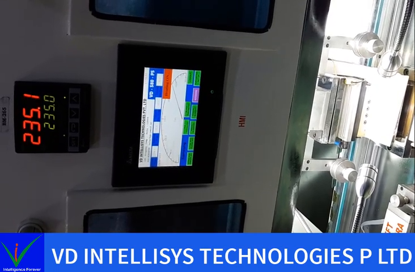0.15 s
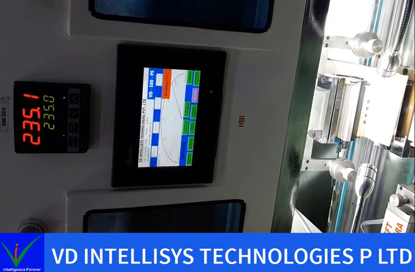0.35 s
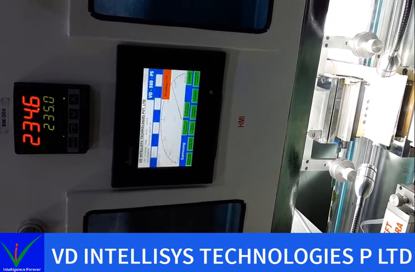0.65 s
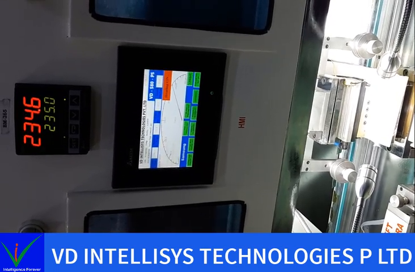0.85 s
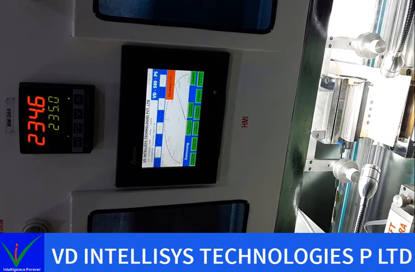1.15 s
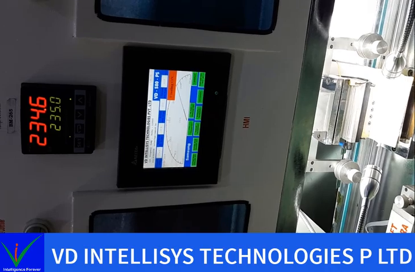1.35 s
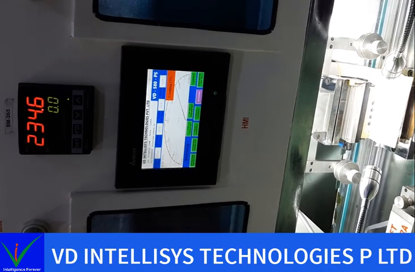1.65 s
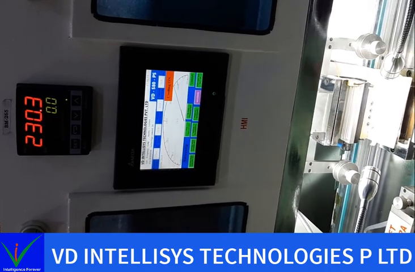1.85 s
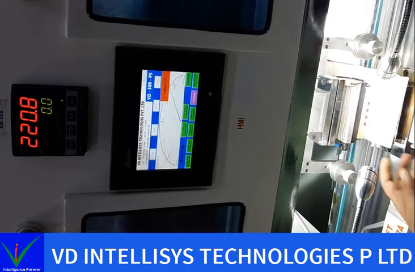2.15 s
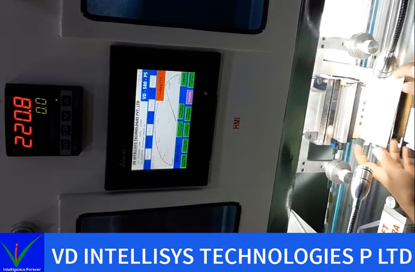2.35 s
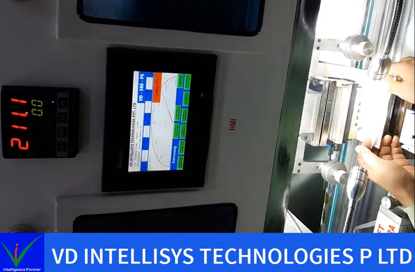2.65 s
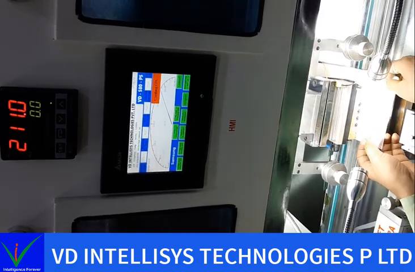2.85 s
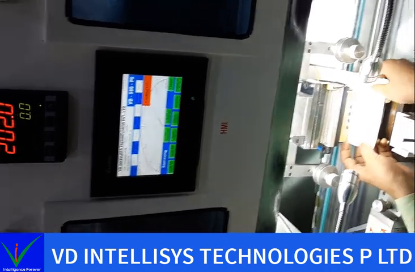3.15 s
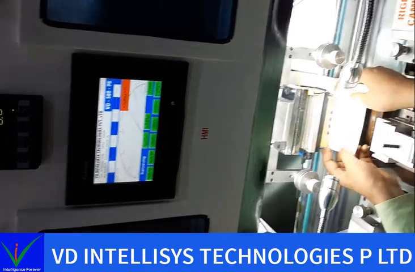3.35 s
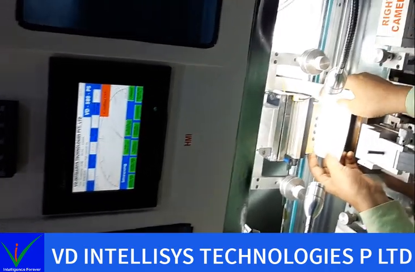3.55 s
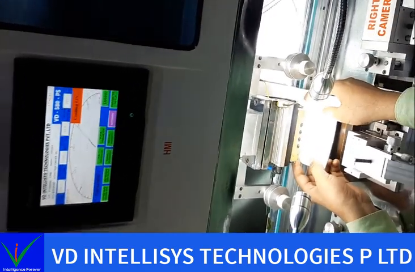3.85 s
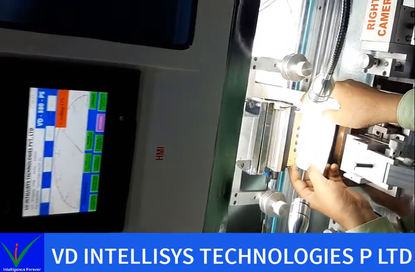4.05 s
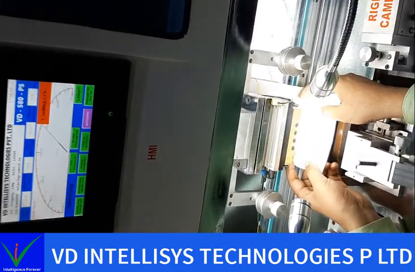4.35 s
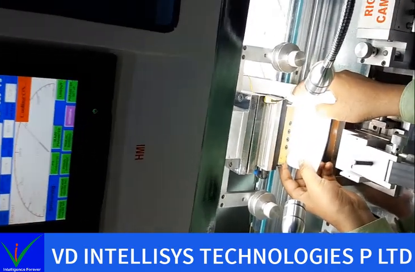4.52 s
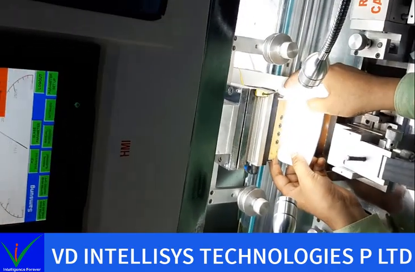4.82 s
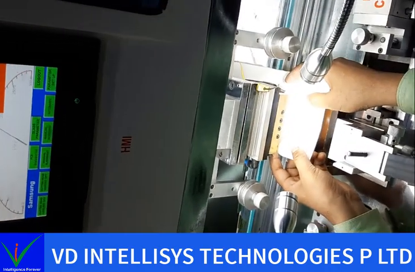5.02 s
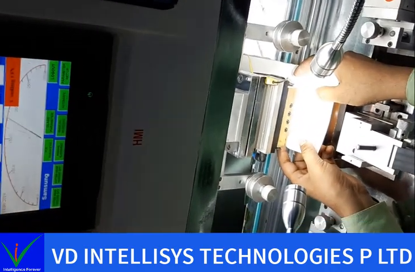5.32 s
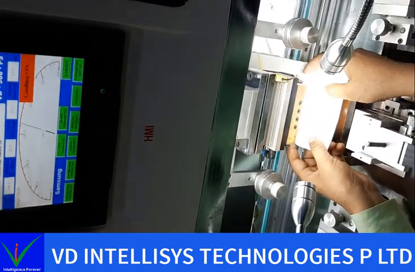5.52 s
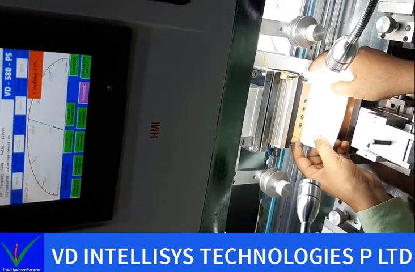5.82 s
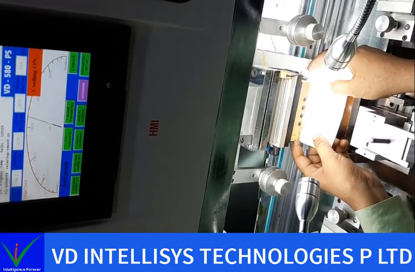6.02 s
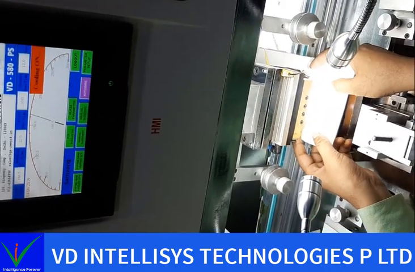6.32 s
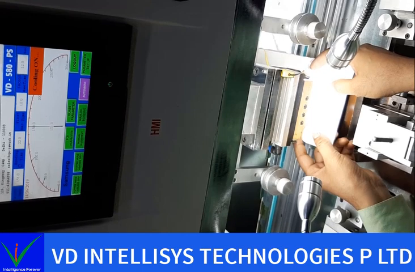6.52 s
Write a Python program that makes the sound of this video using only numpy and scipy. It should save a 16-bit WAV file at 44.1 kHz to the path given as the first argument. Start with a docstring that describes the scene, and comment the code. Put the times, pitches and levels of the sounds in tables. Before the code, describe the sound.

Close stereo pickup beside a bonding machine: low uneven motor noise with faint hum and a small air leak, then a quick click-like valve burst. Air rushes out brightly, fades a little, and leaves a narrow, hollow howl. Around two and a half seconds hands disturb the jet; the hiss swells into a loud, fluttering rush with low gusty buffeting, still blowing as the sound ends.

```python
"""Compressed air jets onto the hot head of a bonding machine: filtered noise hisses, gap resonances howl.
A valve snaps open at about 1 s (two decaying noise bursts); a first surge of air dies away within a second.
Hands reach into the stream and the microphones move closer: the hiss swells, most howl pitches sink a little.
Behind it the machine's noise bands and wavering hum lines are strong at first, then drop far back."""
import sys
import numpy as np
from scipy import signal
from scipy.fft import rfft, irfft, next_fast_len
from scipy.io import wavfile
from scipy.ndimage import uniform_filter1d, map_coordinates

SR = 44100
rng = np.random.default_rng(int(sys.argv[2]) if len(sys.argv) > 2 else 0)


def unload_audio(sound):
    """Save the sound as a 16-bit wav file, at the path given as the first command line argument."""
    columns = np.transpose(np.atleast_2d(sound))
    # keep every value between -1 and 1, then stretch to whole-number steps
    steps = np.round(np.clip(columns, -1, 1) * 32767)
    wavfile.write(sys.argv[1], SR, steps.astype(np.int16))


N = 294588
T = np.arange(N) / SR
SIZE = 2 * next_fast_len(N // 2 + 2048)
HZ = np.maximum(np.fft.rfftfreq(SIZE, 1 / SR), 1)

# Hiss strength, before a fixed offset: (time [s], level [dB])
HISS_LEVEL = [(1.87, -35.5), (2.43, -32), (2.92, -25.5), (3.44, -21), (3.58, -23), (4.4, -22.5),
              (5.35, -22), (5.6, -25), (6.64, -23)]
# Hiss spectrum, relative: (frequency [Hz], left density [dB per Hz], right density [dB per Hz])
HISS_COLOUR = [(1100, -30, -22), (1554, -3.5, -4), (1850, 5.5, 3.5), (2964, 3, 0.5), (3050, -0.5, -13),
               (4580, 4, -15), (5470, 3, -3), (6660, 1.5, -51), (7350, -3, -14.5), (9400, -2, -12),
               (9390, 1.5, -4.5), (11700, 1.5, -2.5), (14000, 1.5, -1.5), (17500, -3.5, -8.5)]
# Hiss stereo: (frequency [Hz], left-right likeness [0-1])
HISS_LIKENESS = [(1200, 0.79), (1600, 0.86), (2600, 0.31), (5000, 0.17), (15000, 0.25)]
# Gap resonances, howl and upper: (far pitch [Hz], near pitch [Hz], width [Hz], far level [dB, relative],
# near level [dB, relative], left minus right [dB], likeness [0-1], right lag before the lag factor [ms])
HOWL_MODES = [(1850, 1760, 500, -9.5, -9, 3.5, 0.58, 0.33), (2140, 2015, 195, 3.5, 2.5, 0.5, 0.86, 0.34),
              (2284, 2230, 260, -2.5, -13, -6, 0.84, 0.39), (2662, 2430, 185, -4, -3, 0, 0.93, 0.43),
              (2900, 3100, 940, -21, -17, 7, 0.7, 0.5)]
UPPER_MODES = [(4253, 3970, 270, -1, 2.5, 6.1, 0.84, 0.44), (4100, 4330, 430, -1, -2.5, 8.7, .45, 0.485),
               (5324, 5420, 490, -4.5, -7, 6.7, 0.38, 0.325)]
# Howl flares: (time [s], rise [dB], length [s])
HOWL_FLARES = [(2.93, 1.5, 0.17), (5.05, 1, 0.089), (5.92, 2.5, 0.078), (6.48, 2, 0.12)]
# Low buffeting spectrum, relative: (frequency [Hz], density [dB per Hz])
BUFFET_COLOUR = [(18, -62), (30, -35), (108, -30), (159, -12.5), (221, -9.5), (263, -3), (332, 0),
                 (388, -1.5), (419, -3), (547, -8), (808, -5), (1120, -13), (1250, -7.5), (1620, 2),
                 (2750, -120)]
# Gusts against head and hands: (time [s], rise [dB], length [s])
GUSTS = [(2.97, 5, 0.034), (3.15, 4.5, 0.057), (3.39, 9, 0.067), (4.48, 3, 0.093), (5.35, 3, .06),
         (5.88, 4.5, 0.024), (6.08, 3, 0.057), (6.67, 7, 0.029)]
# Microphones approach the head: (time [s], nearness [0-1], factor on the inter-microphone lag [ratio])
APPROACH = [(1, 0.01, 0.95), (2.5, 0.04, 0.93), (3, 0.08, 0.93), (3.55, 0.14, 0.95), (3.9, 0.79, 1.03),
            (4.6, 1, 1.095), (5.3, 1, 1.115), (6.68, 0.95, 1.18)]
# Reflections off the machine frame: (far delay [ms], near delay [ms], gain [ratio])
ECHOES = [(1.29, 1.4, 0.15), (3.124, 3, 0.2), (5.71, 4.9, 0.3), (9.29, 8.4, 0.2), (14.87, 14, 0.18),
          (23.5, 21.7, 0.16)]
# First surge spectrum, relative: (frequency [Hz], density [dB per Hz])
SURGE_COLOUR = [(1760, -48), (3000, -12.5), (3290, -16), (3550, -8), (4200, 2), (4440, -2), (4700, -12),
                (5140, -1), (6440, 0.5), (6900, 0), (7460, -7.5), (8580, -11.5), (11100, -8),
                (15000, -13.5), (16000, -10.5)]
# Valve bursts: (time [s], level [dB], ring [Hz], width [Hz], decay [s], left minus right [dB])
VALVE_BURSTS = [(0.999, -25, 4700, 7000, 0.0069, 23), (1.0066, -7.5, 1980, 1100, 0.0016, 8)]
# Machine noise spectra, relative: (frequency [Hz], density [dB per Hz])
RUMBLE_COLOUR = [(18, -43), (30, -13), (54, -16), (92, 0.5), (124, -3.5), (178, -0.5), (243, -1.5),
                 (329, 1), (373, -9.5), (600, -13), (780, -38), (1320, -120)]
WHIRR_COLOUR = [(240, -25), (400, -5.5), (595, -7.5), (751, -5), (809, -4), (1350, -15), (1520, -12.5),
                (1610, -12.5), (1750, -19), (1960, -28), (2400, -40), (3120, -63), (5280, -120)]
LEAK_COLOUR = [(1180, -26), (2000, -3.5), (2390, -6.5), (2730, -4), (3260, -7.5), (3520, -8), (3800, -7.5),
               (5060, -15), (5690, -13), (5830, -5), (6140, -15), (6460, -7.5), (7900, -26.5),
               (12600, -32.5), (15000, -47)]
# Hum lines, before a fixed offset, panning and the drop: (frequency [Hz], level [dB])
HUM_LINES = [(96.9, -37.5), (328.4, -35), (807.5, -39), (1486, -45), (2740, -48)]
# Machine balance: (frequency [Hz], left minus right [dB])
MACHINE_PAN = [(60, 4), (92, 3.5), (140, 1), (210, 0), (330, 1), (500, -2), (770, 4.5), (1170, 2.5),
               (1790, 0), (2740, 13), (4190, 26), (6410, 46), (9810, 26.5), (15000, 20.0)]
# Machine stereo: (frequency [Hz], left-right likeness [0-1])
MACHINE_LIKENESS = [(40, .3), (130, 1), (330, 0.73), (700, 0.21), (1500, 0.22), (3000, 0.092)]
# Rumble heaves, whirr swells: (time [s], rise [dB], length [s])
RUMBLE_HEAVES = [(.29, 7, 0.11), (.76, 5.5, 0.049)]
WHIRR_SWELLS = [(.06, 3.5, 0.024), (.47, 3.5, 0.097), (.95, 3, .08)]
# Brief noise swells: (time [s], level [dB], centre [Hz], width [Hz], length [s], left minus right [dB])
BAND_SWELLS = [(.305, -23, 91, 80, 0.028, 11), (0.497, -42, 6000, 220, 0.085, 32),
               (0.539, -21, 500, 300, 0.0047, -2), (0.555, -26, 524, 160, .012, -1),
               (4.33, -54, 125, 60, 0.064, 9), (4.457, -49, 190, 108, 0.071, 9)]

VALVE_S = 1.007
OVERSHOOT_DB, OVERSHOOT_S = 7.5, 0.074  # extra level at opening, e-fold decay
HANDS_IN_S, HANDS_REACH_S = 2.63, 0.35  # middle and half length of the move
HOWL_DB, HOWL_HANDS_DB = -29, 9.5  # free jet, rise with hands in
BUFFET_DB, BUFFET_HANDS_DB = -55.5, 14.5
SURGE_DB, SURGE_HOLD_S, SURGE_FALL_DB_PER_S, SURGE_END_S = -16.5, 0.26, 21, 1.83
RUMBLE_DB, WHIRR_DB, LEAK_DB = -29, -29.5, -35.5  # before the drop
LEAK_RISE_DB, LEAK_RISE_S = 14, 0.03
CUTOFF_HZ = 15850


def jet(near, lag_factor):
    """Steady jet: turbulent hiss, howling gaps and low buffeting, sharing one flutter."""
    hiss_db, = in_time(HISS_LEVEL)
    hands = step(HANDS_IN_S, HANDS_REACH_S)
    howl_db = HOWL_DB + HOWL_HANDS_DB * hands + overshoot_db() + bumps_db(HOWL_FLARES)
    buffet_db = BUFFET_DB + BUFFET_HANDS_DB * hands + bumps_db(GUSTS)

    air = noise(in_hz(HISS_COLOUR), in_hz(HISS_LIKENESS)[0], lag_ms=0.434)
    air = reflected(air, near)
    hiss = from_db(hiss_db + 4.0) * patchy(air, depth_db=0.58, rate_hz=3.0)
    howl = from_db(howl_db) * resonances(HOWL_MODES, near, lag_factor) * flutter(1.0, 11)
    # upper resonances stand further out of the hiss close to the head
    upper_db = hiss_db - 3.0 + 2.77 * near
    upper = from_db(upper_db) * resonances(UPPER_MODES, near, lag_factor) * flutter(1.0, 21)
    # hiss and howl are thin below about 1.5 kHz; the low buffeting is added separately
    highpass = signal.butter(8, 1450, "high", fs=SR, output="sos")
    bright = signal.sosfilt(highpass, hiss + howl + upper)

    buffet = noise(in_hz(BUFFET_COLOUR), 0.91, lag_ms=0.39) * panned(0.59)
    buffet = from_db(buffet_db) * buffet * flutter(0.52, 11)
    whole = bright + patchy(buffet, depth_db=3.5, rate_hz=16)
    return whole * flutter(0.53, 20) * step(VALVE_S, 0.0027)


def resonances(modes, near, lag_factor):
    """Turbulence rings in gaps: noise-modulated carriers whose pitch and level follow nearness."""
    out = 0
    for far_hz, near_hz, width_hz, far_db, near_db, pan_db, likeness, lag_ms in modes:
        pitch_hz = far_hz + (near_hz - far_hz) * near
        carrier = np.exp(2j * np.pi * np.cumsum(pitch_hz) / SR)
        left = (narrow(width_hz / 2) * carrier).real
        own = (narrow(width_hz / 2) * carrier).real
        alike = np.clip(likeness, 0, 1)
        shared = delayed(left, lag_factor * lag_ms / 1000)
        right = alike * shared + np.sqrt(1 - alike ** 2) * own
        level_db = far_db + (near_db - far_db) * near
        out = out + np.array([left, right]) * panned(pan_db) * from_db(level_db)
    return rms_one(out)


def reflected(x, near):
    """Short frame echoes comb the air noise; the comb slides with microphone sway and approach."""
    out = x.copy()
    for far_ms, near_ms, gain in ECHOES:
        sway_ms = 0.031 * rms_one(narrow(0.94).real)
        delay_s = (far_ms + (near_ms - far_ms) * near + sway_ms) / 1000
        out += gain * np.array([np.interp(T - delay_s, T, side) for side in x])
    return rms_one(out)


def overshoot_db():
    """Extra air level [dB] decaying from the valve opening."""
    return OVERSHOOT_DB * np.exp(-np.maximum(T - VALVE_S, 0) / OVERSHOOT_S)


def surge(near):
    """First rush of air: bright noise, strongly left, that holds, falls and ends."""
    falling_s = np.maximum(T - VALVE_S - SURGE_HOLD_S, 0)
    level_db = SURGE_DB + 0.22 * overshoot_db() - SURGE_FALL_DB_PER_S * falling_s
    air = reflected(noise(in_hz(SURGE_COLOUR), 0.1), near) * panned(48)
    gate = step(VALVE_S + 0.0028, 0.0058) * (1 - step(SURGE_END_S, 0.016))
    return from_db(level_db) * rms_one(air) * gate


def valve():
    """Spit of air, then the valve snap: exponentially decaying bands of noise."""
    out = 0
    for start_s, level_db, ring_hz, width_hz, decay_s, pan_db in VALVE_BURSTS:
        burst = noise(hump_db(ring_hz, width_hz), 0.56, lag_ms=0.26)
        envelope = (T >= start_s) * np.exp(-np.abs(T - start_s) / decay_s)
        out = out + from_db(level_db) * panned(pan_db) * burst * envelope
    return out


def machine():
    """Motor rumble, whirr, hum and a small leak; all drop far back as the air comes on."""
    pan, likeness = panned(in_hz(MACHINE_PAN)), in_hz(MACHINE_LIKENESS)[0]
    pan_db = 20 * np.log10(pan / np.sqrt(np.mean(pan ** 2, axis=0)))

    rumble = noise(in_hz(RUMBLE_COLOUR) + pan_db, likeness, lag_ms=0.19)
    rumble = from_db(RUMBLE_DB + bumps_db(RUMBLE_HEAVES)) * rumble
    whirr = noise(in_hz(WHIRR_COLOUR) + pan_db, likeness, lag_ms=0.37)
    whirr = from_db(WHIRR_DB + bumps_db(WHIRR_SWELLS)) * whirr
    # the leak grows as the valve begins to lift
    lifting = np.exp(np.minimum(T - VALVE_S, 0) / LEAK_RISE_S)
    leak = noise(in_hz(LEAK_COLOUR) + pan_db, likeness)
    leak = from_db(LEAK_DB + LEAK_RISE_DB * lifting) * leak

    hum = 0
    for hz, level_db in HUM_LINES:
        wavering = narrow(4 + 0.0031 * hz)
        tone = (wavering * np.exp(2j * np.pi * hz * T)).real
        side_db = pan_db[:, [np.searchsorted(HZ, hz)]]
        hum = hum + from_db(level_db - 4.5 + side_db) * rms_one(tone)

    drop_db = -20 * step(VALVE_S + 0.0098, 0.009) - 17 * step(1.17, 0.11)
    return (patchy(rumble + whirr + leak, depth_db=3.0, rate_hz=13.9) + hum) * from_db(drop_db)


def swells():
    """Dull bumps and a short whistle: narrow bands of noise that rise and fall."""
    out = 0
    for centre_s, level_db, hz, width_hz, length_s, pan_db in BAND_SWELLS:
        band = rms_one(noise(hump_db(hz, width_hz), 0.43) * panned(pan_db))
        out = out + from_db(level_db) * band * np.exp(-((T - centre_s) / length_s) ** 2)
    return out


def noise(colour_db, likeness, lag_ms=0):
    """Coloured stereo noise; the shared part reaches the right microphone lag_ms later."""
    left, own = rfft(rng.standard_normal((2, SIZE)))
    alike = np.clip(likeness, -1, 1)
    shared = left * np.exp(-2j * np.pi * HZ * lag_ms / 1000)
    right = alike * shared + np.sqrt(1 - alike ** 2) * own
    return rms_one(irfft(np.array([left, right]) * from_db(colour_db), SIZE)[:, :N])


def narrow(half_width_hz):
    """Complex envelope of noise in a steep-sided resonance, drawn at SR / 8."""
    shape = (1 + (np.fft.fftfreq(SIZE // 8, 8 / SR) / half_width_hz) ** 4) ** -0.5
    white = rng.standard_normal(len(shape)) + 1j * rng.standard_normal(len(shape))
    slow = np.fft.ifft(shape * white)
    return rms_one(np.interp(np.arange(N) / 8, np.arange(len(slow)), slow))


def hump_db(hz, width_hz):
    """Spectrum [dB] of one steep-sided resonance."""
    return -10 * np.log10(1 + (2 * (HZ - hz) / width_hz) ** 4)


def flutter(depth_db, rate_hz):
    """Randomly wandering gain of rms depth depth_db."""
    return from_db(depth_db * rms_one(narrow(rate_hz).real))


def patchy(x, depth_db, rate_hz):
    """Each third of an octave swells and fades on its own; overall level is kept."""
    spectrum, out = rfft(x, SIZE), 0
    place = np.clip(3 * np.log2(HZ / 100), 0, 22)
    for band in range(23):
        slow = uniform_filter1d(rng.standard_normal(800), size=5)
        gain = np.interp(T * rate_hz, np.arange(800) / 5, from_db(depth_db * rms_one(slow)))
        weight = np.maximum(1 - np.abs(place - band), 0)  # overlapping triangles
        out = out + irfft(spectrum * weight, SIZE)[:, :N] * gain
    return out * np.std(x) / np.std(out)


def delayed(x, seconds):
    """Read a signal late by a delay that may vary in time."""
    return map_coordinates(x, [(T - seconds) * SR], order=3)


def step(at_s, rise_s):
    """Smooth change from 0 to 1."""
    return 0.5 + 0.5 * np.tanh((T - at_s) / rise_s)


def bumps_db(rows):
    """Brief smooth rises [dB] above a steady level."""
    return sum(rise_db * np.exp(-((T - s) / length_s) ** 2) for s, rise_db, length_s in rows)


def in_time(rows):
    """Each column of a curve, sample by sample."""
    s, *columns = np.transpose(rows)
    return [np.interp(T, s, c) for c in columns]


def in_hz(rows):
    """Each column of a spectrum on the frequency grid, interpolated in log frequency."""
    hz, *columns = np.transpose(rows)
    return np.array([np.interp(np.log(HZ), np.log(hz), c) for c in columns])


def panned(pan_db):
    """Left and right gains for a level difference."""
    return from_db(np.array([[0.5], [-0.5]]) * pan_db)


def from_db(db):
    """Decibels to gain."""
    return 10 ** (np.asarray(db) / 20)


def rms_one(x):
    """Scale so that the mean of the channels has rms 1."""
    mid = np.atleast_2d(x).mean(axis=0)
    return x / np.sqrt(np.mean(np.abs(mid) ** 2) + 1e-20)


def scene():
    """Air, valve and machine together."""
    near, lag_factor = in_time(APPROACH)
    return jet(near, lag_factor) + surge(near) + valve() + machine() + swells()


def record(dry):
    """Clip peaks at full scale, then cut the top above CUTOFF_HZ."""
    top = 1 - 0.5 * (1 + np.tanh((HZ - CUTOFF_HZ) / 50))
    return irfft(rfft(np.clip(dry, -1, 1), SIZE) * top, SIZE)[:, :N]


dry = scene()
out = record(dry)
unload_audio(out)
```